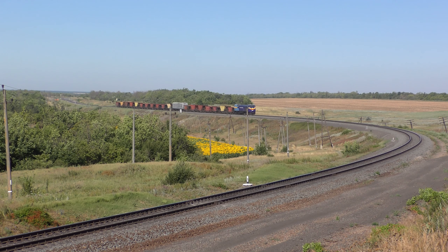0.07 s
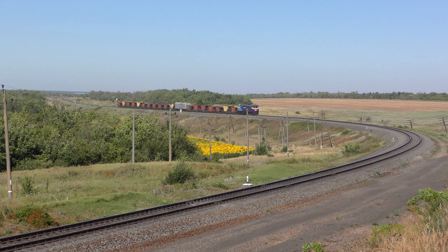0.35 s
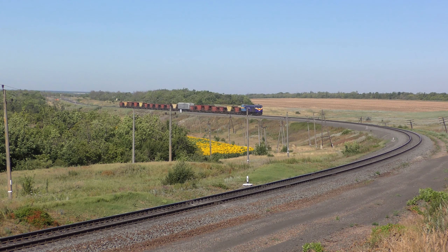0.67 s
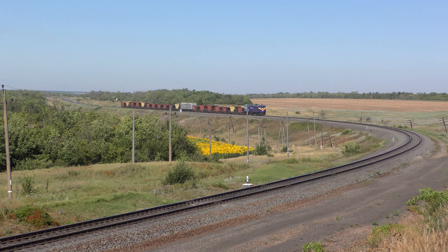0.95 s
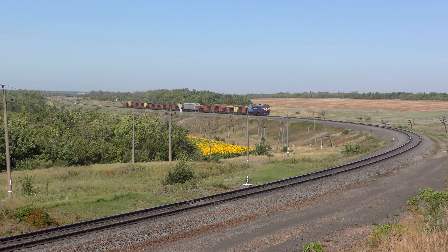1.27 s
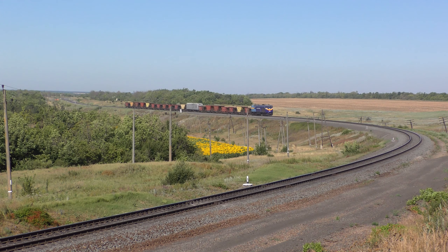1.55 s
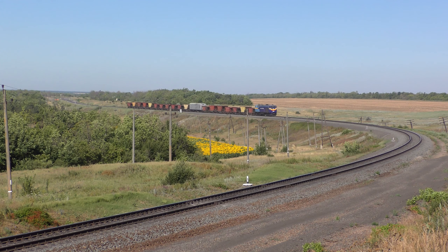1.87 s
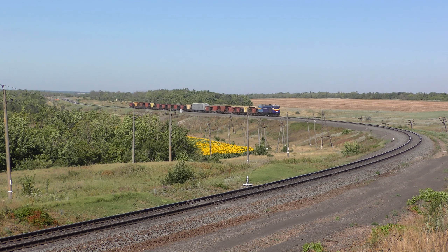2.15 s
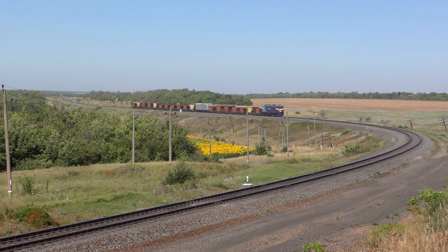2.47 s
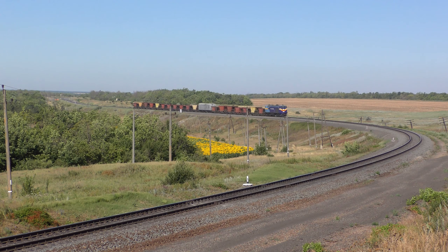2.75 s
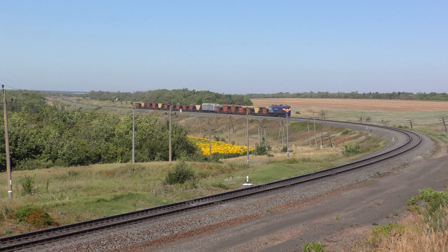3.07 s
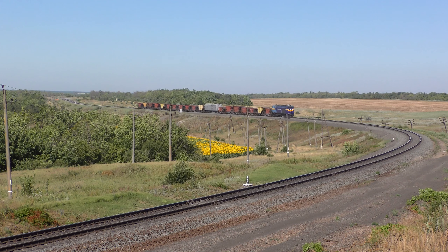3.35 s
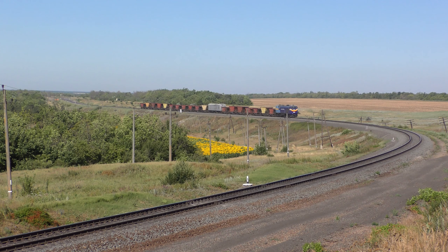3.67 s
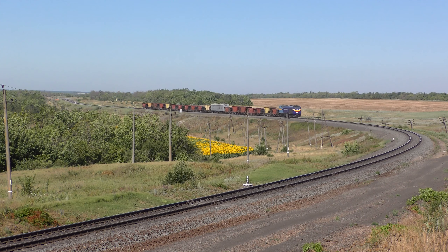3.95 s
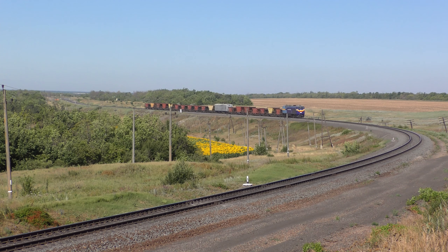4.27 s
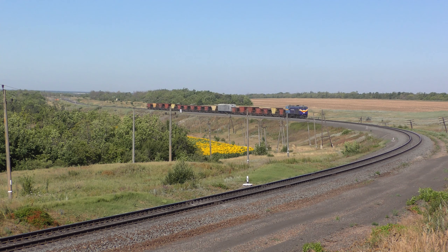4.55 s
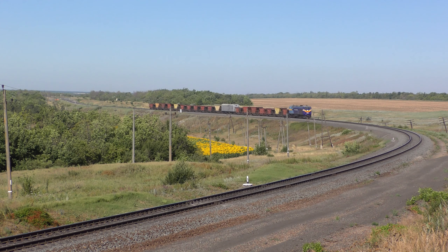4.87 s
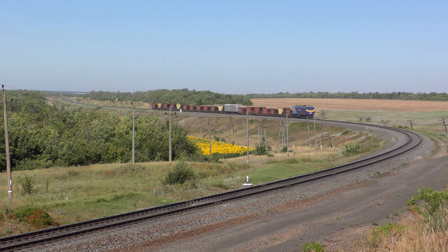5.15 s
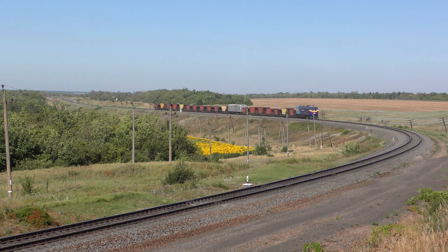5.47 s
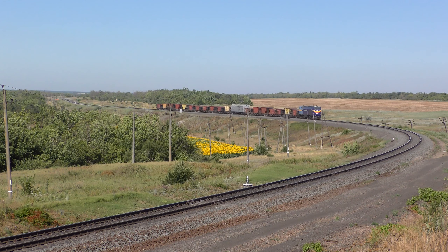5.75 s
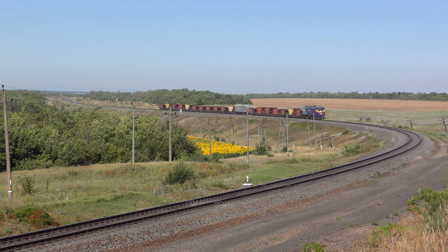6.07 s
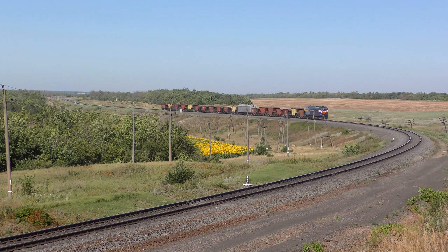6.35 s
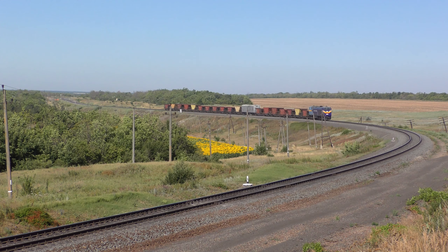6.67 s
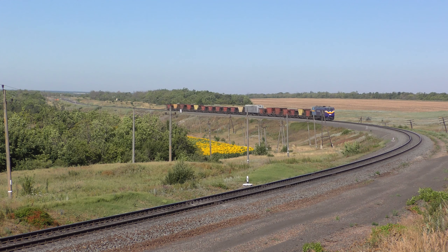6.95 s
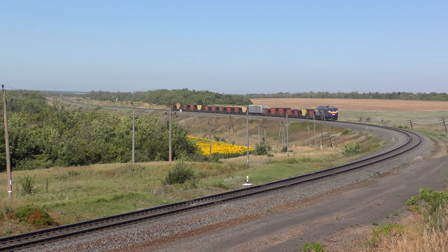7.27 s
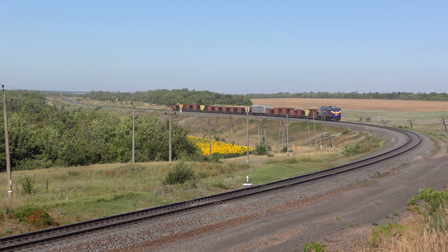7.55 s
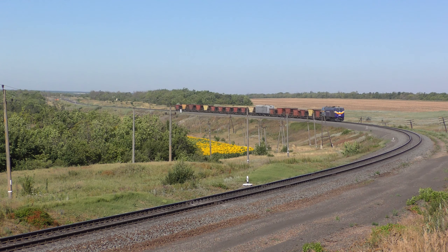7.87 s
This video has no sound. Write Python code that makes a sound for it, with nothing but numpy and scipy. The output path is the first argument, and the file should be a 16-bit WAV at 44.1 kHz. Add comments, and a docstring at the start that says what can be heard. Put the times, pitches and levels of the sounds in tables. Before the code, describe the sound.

A distant diesel locomotive throbs under load, its freight wagons rumbling and clanking, with light wind and faint bird chirps.

```python
"""A distant diesel locomotive hauls a freight train uphill across open country.
From the start its exhaust throbs once per engine cycle over the roar and clatter of wagons, a machinery
whine comes and goes, and light wind brushes the microphone. A faint moan and a beating hum fade within
two seconds; then wheels begin to squeal briefly. A small bird chirps near by until the fourth second.
In the second half the hum returns, the wind puffs harder and the train grows louder as it nears."""
import sys
import numpy as np
from scipy import signal
from scipy.fft import rfft, irfft, next_fast_len
from scipy.io import wavfile

SR = 44100
rng = np.random.default_rng(int(sys.argv[2]) if len(sys.argv) > 2 else 0)


def bounce(signal):
    """Save signal as a 16-bit WAV file at the path given by the first command-line argument."""
    frames = np.transpose(np.atleast_2d(signal))
    limited = np.clip(frames, -1, 1)
    pcm = np.round(limited * 32767).astype(np.int16)
    wavfile.write(sys.argv[1], SR, pcm)


N = 353241
TIME = np.arange(N) / SR
MIDWAY_S = 4


def from_db(db):
    """Amplitude ratio of a level in decibels."""
    return 10 ** (np.asarray(db) / 20)


def unit_power(x):
    """Normalisation to a mean square of one."""
    return x / np.sqrt(np.mean(x ** 2) + 1e-20)


def in_time(rows):
    """Linear interpolation of each column against the first, which is time."""
    s, *columns = np.transpose(rows)
    return [np.interp(TIME, s, column) for column in columns]


def ramp_db(midway_db, db_per_s):
    """Exponential growth: a level that is linear in decibels."""
    return midway_db + db_per_s * (TIME - MIDWAY_S)


def bell(centre_s, half_s):
    """Gaussian envelope, down to 1/e at half_s from its centre."""
    return np.exp(-((TIME - centre_s) / half_s) ** 2)


def drift(rate_hz):
    """Random modulation: low-pass noise of unit power with its corner at rate_hz."""
    hop, settle = 100, 2000
    pole = np.exp(-2 * np.pi * hop * rate_hz / SR)
    white = rng.standard_normal(N // hop + settle + 2)
    slow = signal.lfilter([1], [1, -2 * pole, pole * pole], white)[settle:]
    return np.interp(np.arange(N) / hop, np.arange(len(slow)), unit_power(slow))


def coloured_noise(spectrum, modes=()):
    """Spectral shaping: noise of unit power with a broad contour and resonance peaks."""
    size = next_fast_len(N)
    hz = np.maximum(np.fft.rfftfreq(size, 1 / SR), 1)
    points_hz, points_db = np.transpose(spectrum)
    shape_db = np.interp(np.log(hz), np.log(points_hz), points_db)
    shape_db -= 20 * np.log10(np.maximum(hz / points_hz[-1], 1))
    for centre, width, lift_db in modes:
        shape_db += lift_db / (1 + (2 * (hz - centre) / width) ** 2)
    return unit_power(irfft(rfft(rng.standard_normal(size)) * from_db(shape_db))[:N])


def wavering_tone(hz, waver_hz, fade_db):
    """Scintillation: moving air modulates the frequency and amplitude of a sine."""
    phase = 2 * np.pi * np.cumsum(hz + waver_hz * drift(7.24)) / SR
    return unit_power(from_db(fade_db * drift(3.9)) * np.sin(phase))


# Spectra of the wind and the hiss. Each row: frequency in Hz, relative density in dB.
WIND_SPECTRUM = [(4, -17), (10, -3), (17, -1.5), (30, -12.5), (60, -6), (100, -12.5), (200, -36.5),
                 (500, -66.5)]
HISS_SPECTRUM = [(1000, -16), (4000, 3.5), (6500, 0), (10000, -2), (15500, -5)]
# Puffs of wind. Each row: centre in seconds, level in dB.
WIND_PUFFS = [(.38, -35), (1.38, -40), (4.33, -31), (5.4, -31), (6.8, -36.5)]


def air():
    """Pressure fluctuations of a rising breeze buffet the microphone, over a faint steady hiss."""
    breeze = from_db(ramp_db(-34, db_per_s=1.2))
    gusts = sum(from_db(db) * bell(s, half_s=0.23) for s, db in WIND_PUFFS)
    wind = (breeze + gusts) * coloured_noise(WIND_SPECTRUM)
    return wind + from_db(-66) * coloured_noise(HISS_SPECTRUM)


# Chirps. Each row: start and length in seconds, first, middle and last frequency in Hz, level in dB.
BIRD_CHIRPS = [(.05, .08, 6100, 5260, 4750, -64), (0.538, .048, 3900, 5700, 3820, -61),
               (0.552, .028, 3650, 4150, 3800, -56.5), (.708, .05, 5450, 5300, 5150, -68.5),
               (1.305, .055, 5150, 5600, 5150, -73), (2.934, .08, 4400, 5600, 4500, -70.5),
               (3.621, .03, 4180, 5750, 5100, -62.5), (3.728, 0.04, 5600, 6050, 4900, -62),
               (3.792, .21, 4600, 4330, 4340, -65)]


def bird(waver_hz=110, ragged_db=3, echo_db=-9, echo_s=.03):
    """Frequency modulation makes thin, ragged whistles; scattering in bushes adds a short tail."""
    song, waver = np.zeros(N), waver_hz * drift(150)
    for s, length, first_hz, middle_hz, last_hz, db in BIRD_CHIRPS:
        along = np.linspace(0, 1, int(length * SR))
        span = int(s * SR) + np.arange(len(along))
        parabola = np.polyfit([0, .5, 1], [first_hz, middle_hz, last_hz], 2)
        phase = 2 * np.pi * np.cumsum(np.polyval(parabola, along) + waver[span]) / SR
        song[span] += from_db(db) * signal.windows.tukey(len(along), .2) * np.sin(phase)
    song *= from_db(ragged_db * drift(80))
    age = TIME[:SR // 2]
    bushes = rng.standard_normal(len(age)) * np.exp(-age / echo_s)
    return song + from_db(echo_db) * signal.fftconvolve(song, bushes / np.linalg.norm(bushes))[:N]


# The train's rumble. Each row: frequency in Hz, relative density in dB.
RUMBLE_SPECTRUM = [(40, -7), (130, 1), (200, 3.5), (260, 0), (400, -2.5), (480, -2), (600, -5), (900, -34),
                   (3000, -68)]


def rumble():
    """Low broadband noise of the heavy train, growing as the distance shrinks."""
    return from_db(ramp_db(-40.5, db_per_s=0.4)) * coloured_noise(RUMBLE_SPECTRUM)


# A faint moan. Each row: time in seconds, frequency in Hz, level in dB.
MOAN_GLIDE = [(0, 405, -57), (.35, 396, -46), (.55, 382, -51), (.75, 378, -44), (.92, 378, -50),
              (1.6, 378, -70)]


def moan(blur_hz=22, flicker_db=4.8):
    """Random modulation broadens a sinking, dying tone into a diffuse band."""
    hz, db = in_time(MOAN_GLIDE)
    phase = 2 * np.pi * np.cumsum(hz + blur_hz * drift(45)) / SR
    return from_db(db) * unit_power(from_db(flicker_db * drift(25)) * np.sin(phase))


# The train's hum. Each row: time in seconds, relative levels of the lower and upper tone in dB.
HUM_LEVELS = [(0, -62, -58), (.22, -46, -47), (.42, -52, -46), (.55, -62, -56), (.8, -51, -59),
              (1.02, -45, -41), (1.2, -53, -49), (1.42, -55, -51), (1.6, -59.5, -61.5),
              (4.55, -56.5, -60.5), (4.8, -42.5, -48.5), (5.05, -54, -54), (5.35, -47, -47.5),
              (5.62, -48.5, -47), (5.88, -57, -58), (6.2, -51, -44.5), (6.5, -57, -52), (6.75, -44.5, -53),
              (7.05, -54.5, -59.5), (8, -57.5, -55.5)]


def hum(pair_hz=(340, 357), gain_db=-2.5):
    """Beating: two close tones come and go, interfering at their difference frequency."""
    tones = [wavering_tone(hz, waver_hz=2.5, fade_db=1.5) for hz in pair_hz]
    return sum(from_db(db + gain_db) * tone for db, tone in zip(in_time(HUM_LEVELS), tones))


# Squeals on the curve. Each row: centre in seconds, frequency in Hz, level in dB, half length in seconds.
FLANGE_SQUEALS = [(1.817, 1670, -44, .035), (2.15, 1690, -47, .03), (2.28, 1650, -48, .03),
                  (2.414, 1697, -41.5, 0.033), (4.088, 1624, -50, .07), (4.798, 1654, -48, .06),
                  (5.024, 1690, -46.5, .05), (5.046, 2450, -49, .032), (5.297, 1660, -46, .05),
                  (6.4, 1640, -51, .04), (7.487, 1653, -48, .09)]


def squeals():
    """Friction excitation: a flange rubs the rail and the wheel sings for an instant."""
    return sum(from_db(db) * bell(s, half_s) * wavering_tone(hz, waver_hz=8, fade_db=1.0)
               for s, hz, db, half_s in FLANGE_SQUEALS)


# Spectra of the rolling roar and ringing steel. Each row: frequency in Hz, relative density in dB.
ROAR_SPECTRUM = [(200, -21), (400, -7.5), (550, 0), (750, 1), (950, -3), (1200, -6.5), (1600, -25),
                 (3000, -40.5)]
STEEL_SPECTRUM = [(500, -13.5), (900, 3.5), (1200, -2.5), (1450, -1), (2000, -1), (2650, -3), (2900, -7),
                  (3200, -13), (3900, -15), (4500, -21), (5500, -29.5), (7000, -44), (12000, -57)]
# Modes of the wheels. Each row: frequency in Hz, width in Hz, lift in dB.
WHEEL_RESONANCES = [(1619, 45, 4), (1686, 91, 3.5), (2215, 51, 5), (2432, 79, 5.5)]
# Wheels on rails. Each row: time in seconds, relative levels of steel ring and bright hiss in dB.
ROLLING_LEVELS = [(0, -38.5, -59), (.42, -38, -61), (.55, -41.5, -62), (.9, -40, -62.5), (1.15, -40.5, -62),
                  (1.5, -39, -59), (1.85, -40.5, -60), (2.1, -41.5, -61), (2.9, -41, -61.5),
                  (3.25, -41, -62.5), (3.5, -39.5, -61.5), (3.74, -41, -56.5), (3.84, -39.5, -56.5),
                  (4.1, -38.5, -57.5), (4.48, -39.5, -58), (4.85, -38.5, -59.5), (5.2, -41.5, -60.5),
                  (5.4, -38.5, -60), (5.7, -39.5, -56.5), (5.97, -38, -58.5), (6.35, -37.5, -57.5),
                  (6.52, -40.5, -60.5), (6.85, -38, -58), (7.25, -40.5, -57), (7.62, -37, -56),
                  (8, -40.5, -59)]


def wagons(split_hz=3200):
    """Rolling contact excites a roar and wheel resonances; the brightest band fades independently."""
    steel_db, bright_db = in_time(ROLLING_LEVELS)
    lowpass = signal.butter(6, split_hz, fs=SR, output="sos")
    highpass = signal.butter(6, split_hz, "high", fs=SR, output="sos")
    roar = from_db(ramp_db(-42, db_per_s=0.5) + 1.37 * drift(27)) * coloured_noise(ROAR_SPECTRUM)
    steel = signal.sosfilt(lowpass, coloured_noise(STEEL_SPECTRUM, WHEEL_RESONANCES))
    bright = unit_power(signal.sosfilt(highpass, coloured_noise(STEEL_SPECTRUM)))
    steel *= from_db(steel_db - 0.36 + 1.07 * drift(6.8))
    bright *= from_db(bright_db + 0.5 + 1.5 * drift(7.5))
    return roar + steel + bright


# Jolts over rough track. Each row: time in seconds, relative levels of clash and thud in dB.
WAGON_JOLTS = [(.12, -61, -33.5), (.42, -41, -40), (.99, -36.5, -34.5), (1.1, -33, -49),
               (1.805, -31.3, -34), (2.529, -35, -41), (2.88, -49, -33), (3.55, -37, -35), (4.1, -53, -39),
               (4.3, -38.5, -37.5), (5.02, -37.5, -42.5), (5.6, -39.5, -31.5), (6.2, -48, -33.5),
               (6.76, -39, -30.5), (7.039, -35.5, -35), (7.56, -42, -37)]
# Clashing steel. Each row: frequency in Hz, relative density in dB.
CLASH_SPECTRUM = [(300, -14.5), (700, -4), (1000, 2.5), (1400, -1.5), (2300, 0), (2800, -3), (3300, -12.5),
                  (4500, -24.5), (6000, -40.5), (12000, -67.5)]


def clatter(rise_s=0.012, clash_decay_s=0.057, thud_decay_s=.05):
    """Damped impacts: steel clashes and the wagon body thuds, blurred into soft bursts by distance."""
    clashes, thuds = np.zeros((2, N))
    for s, clash_db, thud_db in WAGON_JOLTS:
        age = np.maximum(TIME - s + rise_s, 0)
        attack = 1 - np.exp(-age / rise_s)
        clashes += from_db(clash_db) * attack * np.exp(-age / clash_decay_s)
        thuds += from_db(thud_db) * attack * np.exp(-age / thud_decay_s)
    clashes *= coloured_noise(CLASH_SPECTRUM, WHEEL_RESONANCES)
    return clashes + thuds * coloured_noise(ROAR_SPECTRUM)


# The whine's main line. Each row: time in seconds, relative level in dB.
WHINE_LEVELS = [(0, -47.5), (.3, -52), (.5, -62), (.65, -49), (.78, -43.5), (.88, -42), (.97, -46),
                (1.15, -47.5), (1.33, -46.5), (1.43, -39.5), (1.52, -40.5), (1.62, -53), (1.78, -49),
                (1.92, -43.5), (2.03, -49), (2.18, -58), (2.27, -48), (2.35, -42), (2.44, -47), (2.55, -49),
                (2.67, -42.5), (2.77, -52), (2.91, -43), (3.07, -49), (3.18, -53.5), (3.6, -55),
                (3.77, -42.5), (3.9, -45.5), (3.98, -53), (4.08, -42), (4.2, -47.5), (4.4, -57.5),
                (5.2, -51.5), (5.4, -47), (5.6, -55.5), (5.7, -42.5), (5.92, -41), (6.03, -42.5),
                (6.13, -52), (6.25, -43), (6.55, -52), (6.85, -58), (7.14, -45.5), (7.33, -59), (7.56, -44),
                (7.7, -60), (8, -50)]
# Swells of a close lower line. Each row: centre in seconds, half length in seconds.
LOWER_LINE_SWELLS = [(1.7, 0.16), (3.87, 0.35)]
# Weaker machinery tones. Each row: frequency in Hz, level in dB.
WEAK_LINES = [(1324.5, -56.5), (1767, -58)]


def whine(main_hz=882.5, sag_hz_per_s=0.75, lower_hz=849):
    """Atmospheric fading: the machinery's spectral lines come and go on the breeze."""
    flutter = unit_power(from_db(1.1 * drift(14)))
    sinking_hz = main_hz - sag_hz_per_s * (TIME - MIDWAY_S)
    main = flutter * wavering_tone(sinking_hz, waver_hz=1.4, fade_db=0.8)
    main *= from_db(in_time(WHINE_LEVELS)[0] + 0.1)
    lower_gain = from_db(-48) * sum(bell(s, half_s) for s, half_s in LOWER_LINE_SWELLS)
    lower = lower_gain * wavering_tone(lower_hz, waver_hz=1.5, fade_db=4.0)
    weak = sum(from_db(db) * wavering_tone(hz, waver_hz=3, fade_db=3) for hz, db in WEAK_LINES)
    return main + lower + weak


# Surges of exhaust gas, and the sharper puffs that carry the growl.
# Each row: place in the engine cycle from 0 to 1, relative level in dB.
GAS_SURGES = [(.12, 0), (.176, -5.4), (.31, -6.5), (.845, -4.8)]
SHARP_PUFFS = [(.1, -6), (.347, 0), (.424, -3.3), (.53, -2.6), (.827, -.6)]


def harmonic_phase(order, cycle_hz, stack_hz=90, width_hz=65, growl_from_order=17):
    """Forced resonance: uneven gas pulses ringing the stack set the phase of an exhaust harmonic."""
    hz = order * cycle_hz
    place, db = np.transpose(GAS_SURGES if order < growl_from_order else SHARP_PUFFS)
    pulses = np.sum(from_db(db) * np.exp(-2j * np.pi * order * place))
    stack = 1 / (1 + 1j * (hz ** 2 - stack_hz ** 2) / (hz * width_hz))
    return np.angle(pulses * stack)


def lull(cycles, depth_db=-5, place=.985, sharpness=20):
    """Periodic amplitude modulation: the exhaust falls away just before its strongest surge."""
    return from_db(depth_db * np.exp(sharpness * (np.cos(2 * np.pi * (cycles - place)) - 1)))


# Engine speed. Each row: time in seconds, cycle rate in Hz.
CYCLE_RATE = [(0, 7.742), (2, 7.742), (3, 7.745), (5.5, 7.745), (6.5, 7.757), (8, 7.757)]
# Exhaust lines. Each row: order (multiple of the cycle rate), relative level in dB.
EXHAUST_HARMONICS = [(6, -31), (7, -48), (8, -51), (9, -31.5), (10, -35), (11, -31.5), (12, -23.5),
                     (13, -34.5), (14, -46.5), (15, -21), (16, -38), (17, -40.5), (18, -35), (19, -40),
                     (20, -39), (21, -42.5), (22, -38.5), (23, -48.5), (24, -43), (25, -46.5), (26, -48),
                     (27, -46), (28, -45.5), (29, -55.5), (30, -55.5), (31, -61.5), (32, -60.5)]
# Four bands as the train nears: low boom, firing note, upper drone and growl.
# Each row: order, gain midway in dB, growth in dB per second.
BAND_GROWTH = [(7.9, -1.5, 1.5), (13.3, 1, 0), (15.15, -1.45, 0.9), (25.9, -4.5, 0.44)]
# Fading over the field. Each row: time in seconds, gains of firing note, upper drone and growl in dB.
BAND_FADING = [(0, -12.5, 2, 3), (.5, -4.5, -1.5, -1), (1.5, -1, -0.5, -2), (2.3, -3.5, 0, 2),
               (3.5, -3.5, 1, 2), (4.9, 3.5, 1, -4), (5.45, 5.5, -0.5, 1.5), (6.0, 5.5, -3.5, 5),
               (7.1, -0.5, 0.5, 5), (8, -0.5, 2, -1.5)]
# The notch cut by the ground echo, climbing as the train rounds the bend.
# Each row: time in seconds, frequency in Hz.
GROUND_NOTCH = [(0, 127.7), (1.0, 122), (1.5, 130), (2.4, 154), (3.1, 164.8), (8, 181)]


def exhaust(flutter_db=0.64, jitter_rad=0.06, notch_db=12, notch_width_hz=28, firing_order=12):
    """Superposition: harmonics of the engine cycle bunch into a throb; ground interference dips a band."""
    cycles = np.cumsum(in_time(CYCLE_RATE)[0]) / SR
    cycle_hz = CYCLE_RATE[0][1]
    fading_db = in_time(BAND_FADING)
    notch_hz, = in_time(GROUND_NOTCH)
    band_orders, midway_db, db_per_s = np.transpose(BAND_GROWTH)
    drone = np.zeros(N)
    for order, line_db in EXHAUST_HARMONICS:
        # each line follows its nearest bands; the low boom does not fade
        shares = np.array([np.interp(order, band_orders, band) for band in np.eye(len(band_orders))])
        swell_db = ramp_db(shares @ midway_db, shares @ db_per_s) + shares[1:] @ fading_db
        dip_db = notch_db / (1 + (2 * (order * cycle_hz - notch_hz) / notch_width_hz) ** 2)
        unsteady = order / firing_order  # turbulent air shakes short waves more
        db = line_db + swell_db - dip_db + flutter_db * unsteady * drift(0.65)
        phase = 2 * np.pi * order * cycles + harmonic_phase(order, cycle_hz)
        drone += from_db(db) * np.cos(phase + jitter_rad * unsteady * drift(3.7))
    uneven = from_db(.3 * drift(6))  # no two chugs are equally strong
    return np.sqrt(2) * drone * lull(cycles) * uneven


def scene():
    """Sound pressures add in one channel: the train far off, bird and breeze close by."""
    train = exhaust() + whine() + hum() + moan() + rumble() + wagons() + clatter() + squeals()
    return (train + bird() + air())[None]


def record(dry, cutoff_hz=15750):
    """Band limiting: the ends are tapered and a steep low-pass cuts the highest treble."""
    eased = dry * signal.windows.tukey(N, .001)
    return signal.sosfilt(signal.ellip(10, .1, 90, cutoff_hz, fs=SR, output="sos"), eased)


dry = scene()
out = record(dry)
bounce(out)
```